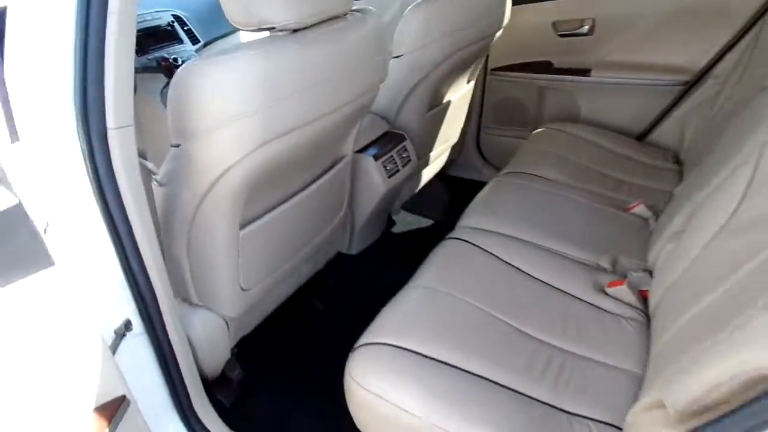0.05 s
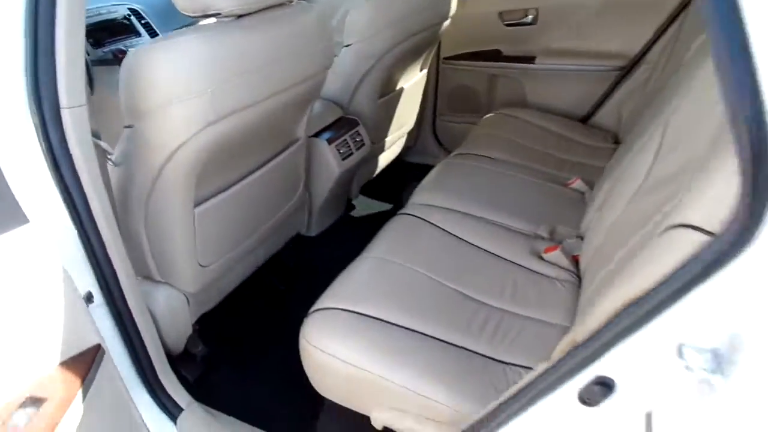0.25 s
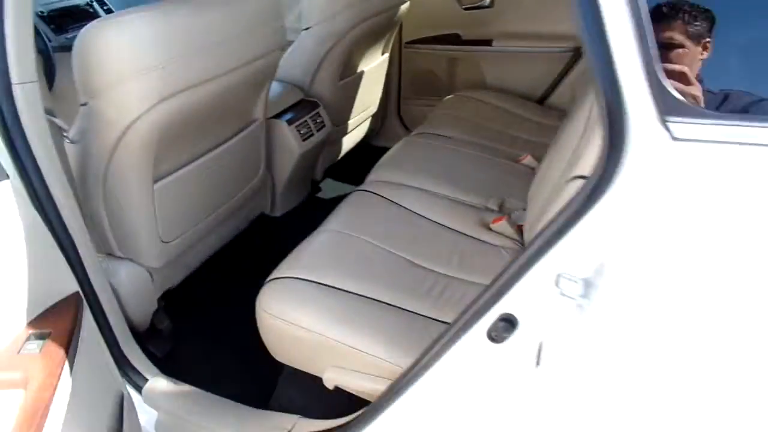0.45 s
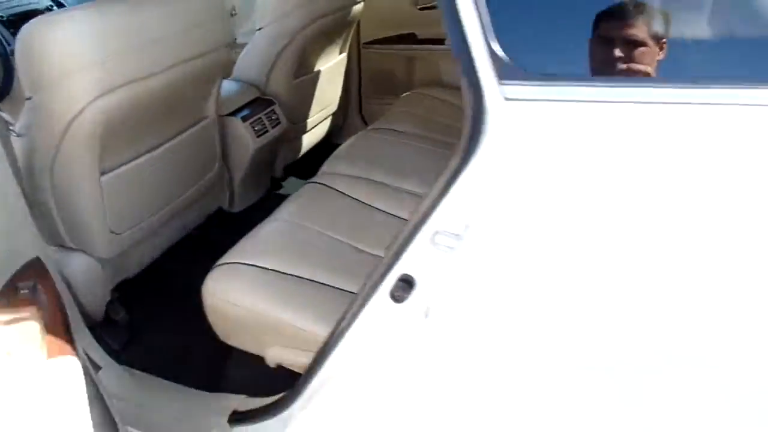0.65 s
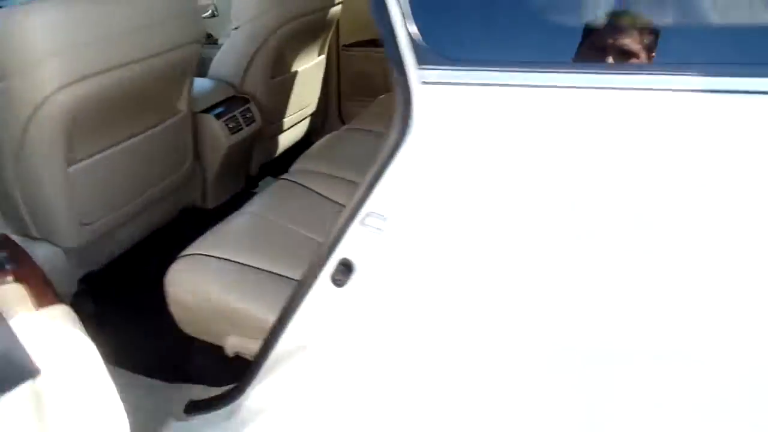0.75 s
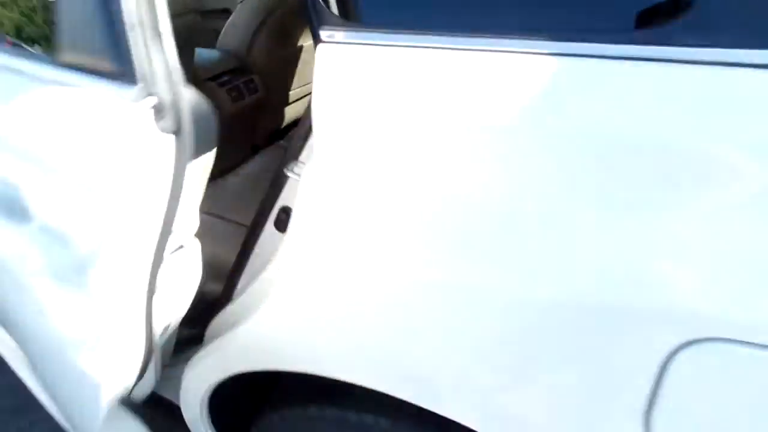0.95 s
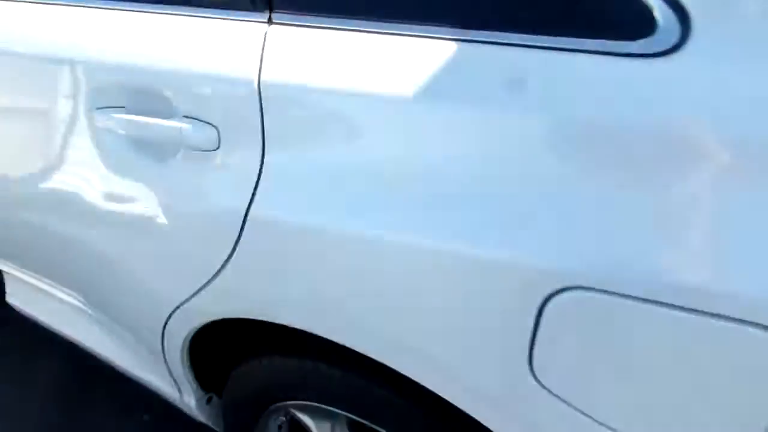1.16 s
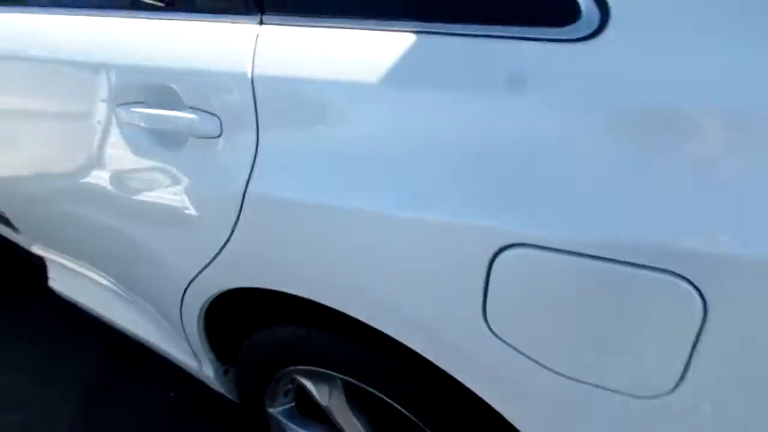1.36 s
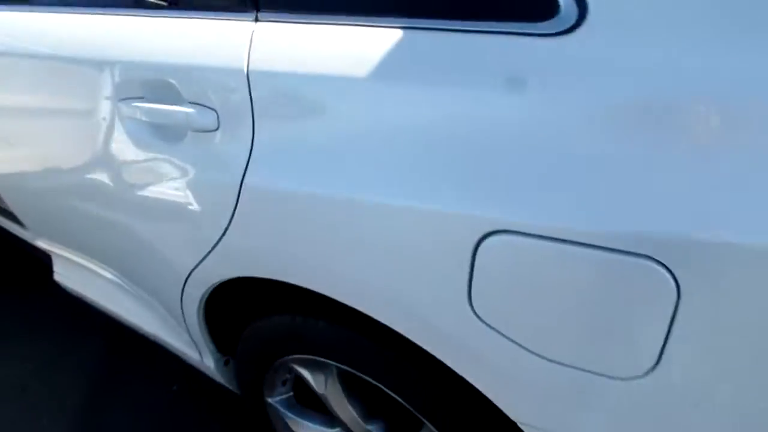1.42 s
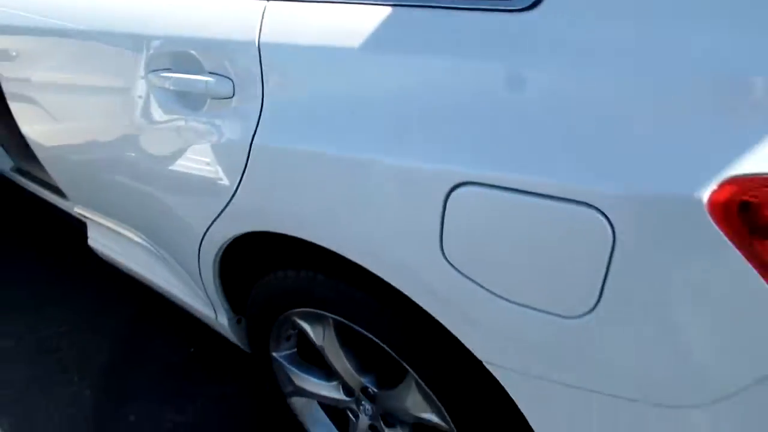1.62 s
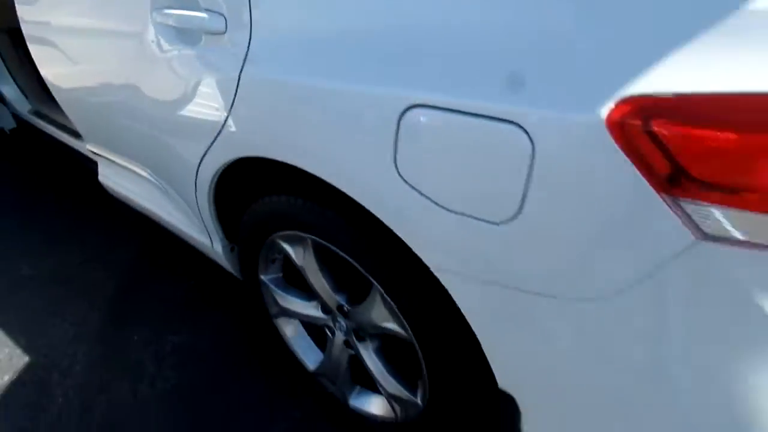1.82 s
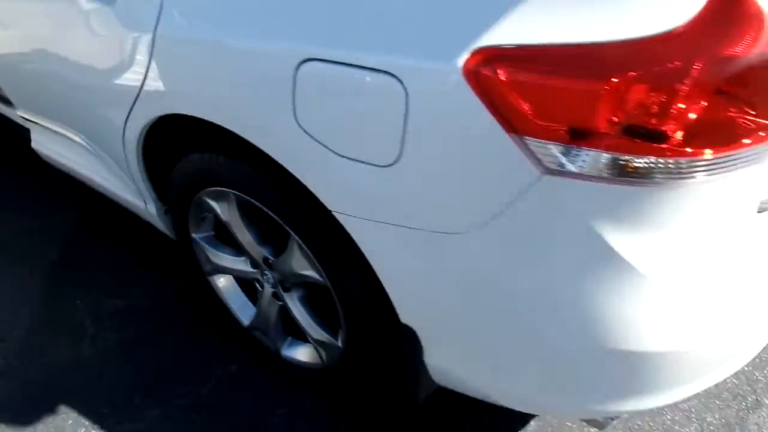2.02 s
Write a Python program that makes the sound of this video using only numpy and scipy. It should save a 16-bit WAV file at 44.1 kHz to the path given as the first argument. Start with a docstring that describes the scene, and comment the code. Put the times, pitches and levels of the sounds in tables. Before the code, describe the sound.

Outdoors beside a car, a brief gust rumbles on the microphone, then the rear door slams with a knock, a thump and a tiny rattle. A longer gust follows, with a faint rush of air behind.

```python
"""Car door in the wind

Outdoors by a car, one microphone. The rear door is pushed shut: the latch catches twice, the panel
rings, the body thumps and the trim rattles briefly. Wind buffets the microphone in a short gust
before the slam and a longer one after it, while air rushes in the background."""
import sys
import numpy as np
from scipy.fft import rfft, irfft, next_fast_len
from scipy.io import wavfile
from scipy.ndimage import map_coordinates

SR = 44100
rng = np.random.default_rng(int(sys.argv[2]) if len(sys.argv) > 2 else 0)


def to_wav(sig):
    """Store sig (one row per channel, or 1-D mono) as 16-bit WAV at the path in sys.argv[1].

    Samples outside -1..1 are clipped; the rate is SR.
    """
    pcm = np.clip(np.atleast_2d(sig), -1, 1) * 32767
    pcm = np.round(pcm).astype(np.int16)
    wavfile.write(sys.argv[1], SR, pcm.T)  # frames by channels


N = 91860

# spectrum of the treble hiss and the scuff: f/Hz, level/dB
HISS_SPECTRUM = [(500, -23.5), (2500, 5), (4500, 0.5), (7000, -2), (10000, -5.5), (13500, -5),
                 (16000, -8.5)]


def door_slam():
    """At the car: each contact rings the panel and the latch, cracks, and thuds through the body."""
    # contacts of the door: t/s, panel ring/dB, latch ring/dB, crack/dB, body thud/dB
    contacts = [(1.1442, -5.5, -8, -19, -20.5), (1.1497, -30, -25, -33, -33),
                (1.1572, -41, -20, -16, -23.5), (1.1610, -14.5, -22, -10.5, -16.5),
                (1.1638, -21, -21, -10.5, -27), (1.1891, -21.5, -28, -29, -17),
                (1.2278, -29.5, -39, -48, -25.5)]
    # modes of the door panel: f/Hz, level/dB, t60/s
    panel_modes = [(611, -1.5, 0.045), (666, -4.5, 0.059), (744, -7, 0.024), (786, -5, 0.043),
                   (864, -12, 0.037), (930, -15, 0.029), (1082, -6, 0.036), (1140, -23, .03)]
    # modes of the steel latch: f/Hz, level/dB, t60/s
    latch_modes = [(1710, -7, 0.014), (2126, -8.5, 0.018), (2350, -2, 0.0077), (2560, -0.5, 0.0076),
                   (3080, -9.5, .008)]
    # modes of the car body and cabin air: f/Hz, level/dB, t60/s
    body_modes = [(33, -17, .25), (64, -8, 0.13), (121.5, -6.5, 0.087), (145.5, -4, 0.13),
                  (224, 4.5, 0.078), (279, -3, 0.086), (369, -2, 0.074)]
    # spectrum of the crack: f/Hz, level/dB
    crack_spectrum = [(150, -22), (600, 10.5), (1200, 6.5), (2700, -6.5), (4200, -12), (7000, -19.5),
                      (12000, -22), (16000, -27)]
    out = np.zeros(N)
    for start, panel_db, latch_db, crack_db, thud_db in contacts:
        t = since(start)
        out += amp(panel_db) * ring(panel_modes, t, attack_s=0.00053)
        out += amp(latch_db) * ring(latch_modes, t, attack_s=0.00025)
        out += amp(crack_db) * fade(t, attack_s=0.00009, t60_s=0.024) * noise(crack_spectrum)
        out += amp(thud_db) * ring(body_modes, t, attack_s=0.0031)
    return out


def trim_rattle():
    """The trim rattles on after the slam, a grainy noise that dies quickly."""
    # spectrum of the rattle: f/Hz, level/dB
    rattle_spectrum = [(100, -7), (400, 2), (650, -0.5), (1100, 0.5), (1500, -7), (2700, -7), (4500, -16.5),
                       (8000, -23.5), (16000, -30)]
    grain_db = 1.3
    rattle = unit(noise(rattle_spectrum) * amp(grain_db * wobble(knots_per_s=500)))
    return amp(-26.5) * fade(since(1.161), attack_s=0.0016, t60_s=0.25) * rattle


def door_scuff():
    """One faint, bright scuff as the door swings in."""
    return amp(-38) * fade(since(0.521), attack_s=0.001, t60_s=0.04) * noise(HISS_SPECTRUM)


def wind_eddies():
    """Right at the microphone: each eddy is a brief suck and push of pressure with a steep core."""
    # single eddies: t/s, level/dB, f/Hz
    eddies = [(.353, -24.5, 58), (.435, -29.5, 55), (0.6362, -12.5, 249), (0.65, -14, 240),
              (.658, -16, 172), (0.6683, -12, 148), (0.677, -13.5, 136), (0.6877, -11, 298),
              (0.7033, -11, 209), (0.793, -27, 268), (0.898, -26.5, 247), (0.916, -23, 265),
              (0.9254, -23.5, 250), (0.981, -26, 234), (.993, -21.5, 207), (1.061, -22.5, 293),
              (1.135, -15.5, 240), (1.509, -24, 600), (1.513, -17.5, 243), (1.525, -23, 520),
              (1.5285, -22.5, 655), (1.542, -22, 325), (1.556, -20, 427), (1.5607, -16, 342),
              (1.5662, -19, 406), (1.574, -24, 497), (1.584, -21, 268), (1.594, -16.5, 302),
              (1.602, -23, 242), (1.627, -20.5, 540), (1.6315, -19.5, 540), (1.635, -13.5, 172),
              (1.661, -16, 280), (1.6994, -15, 390), (1.7065, -10.5, 283), (1.7099, -21, 325),
              (1.7252, -15, 690), (1.737, -22.5, 443), (1.745, -13.5, 374), (1.7707, -13, 312),
              (1.7854, -19, 264), (1.797, -16, 191), (1.8104, -16.5, 322), (1.824, -20.5, 276),
              (1.895, -19, 240), (1.92, -20.5, 370), (1.986, -22.5, 290)]
    half_width_cycles, fringe_share, core_gain = 0.43, 0.41, 0.067
    out, t = np.zeros(N), np.arange(N) / SR
    for centre, db, hz in eddies:
        cycles = (t - centre) * hz
        falloff = (cycles / half_width_cycles) ** 2
        envelope = (1 - fringe_share) * np.exp(-falloff) + fringe_share * np.exp(-falloff / 4)
        phase = 2 * np.pi * cycles + 0.25 * rng.standard_normal()
        core = core_gain * np.exp(-2 * falloff) * np.sin(2 * phase)  # shorter, an octave up
        out += amp(db) * (envelope * np.sin(phase) + core)
    return out


def microphone_crackles():
    """Sharp ticks as the first gust overloads the microphone."""
    # crackles: t/s, level/dB
    crackles = [(0.6789, -14.5), (.687, -16), (.702, -17.5)]
    return sum(amp(db) * fade(since(start), attack_s=0.00001, t60_s=0.0012) for start, db in crackles)


def wind_buffeting():
    """Gusts on the microphone: lumpy low noise over a deep rumble."""
    # course of the gusts: t/s, level/dB
    gust_levels = [(0, -33), (.6, -36.5), (.66, -24.5), (.702, -23.5), (.72, -38), (.79, -36), (.83, -46.5),
                   (.9, -36), (.99, -34), (1.02, -39), (1.06, -31), (1.1, -39.5), (1.2, -29.5),
                   (1.33, -40.5), (1.4, -50.5), (1.47, -41.5), (1.51, -27), (1.57, -29.5), (1.68, -35.5),
                   (1.72, -26.5), (1.82, -35), (1.86, -36.5), (1.91, -33.5), (1.95, -37), (1.99, -33.5),
                   (2.04, -41), (2.08, -58)]
    # spectrum of the gusts: f/Hz, level/dB
    gust_spectrum = [(30, -16), (70, 1), (115, 0), (230, 0.5), (330, -3.5), (450, -14.5), (700, -21),
                     (1200, -32.5), (3000, -69)]
    # course of the rumble: t/s, level/dB
    rumble_levels = [(0, -49), (.28, -36), (.35, -32), (.48, -36.5), (.6, -32.5), (.66, -25.5), (.72, -42),
                     (.81, -48), (.88, -35.5), (1.1, -37.5), (1.28, -46.5), (1.38, -46), (1.46, -46),
                     (1.52, -39), (1.8, -41), (1.94, -57), (2.08, -41)]
    # spectrum of the rumble: f/Hz, level/dB
    rumble_spectrum = [(12, -45), (30, -10.5), (58, -7.5), (90, -7), (160, -3.5), (500, -70)]
    lumps_db = 1.0
    buffeting = unit(amp(lumps_db * wobble(knots_per_s=60)) * noise(gust_spectrum))
    return level(gust_levels) * buffeting + level(rumble_levels) * noise(rumble_spectrum)


def background_air():
    """Air rushes and hisses; the recorder's automatic gain turns it down abruptly after loud sounds."""
    # course of the rush, gain dips written in: t/s, level/dB
    rush_levels = [(0, -36.5), (.11, -34), (.3, -36.5), (.5, -34.5), (.6, -36), (.702, -36), (.71, -44),
                   (.83, -45.5), (1.0, -40.5), (1.14, -40.5), (1.2, -39.5), (1.28, -54), (1.45, -50.5),
                   (1.85, -50.5), (2.08, -49.5)]
    # spectrum of the rush: f/Hz, level/dB
    rush_spectrum = [(60, -4), (85, -19), (114, -0.5), (142, -18.5), (300, -4.5), (450, 0.5), (600, -2),
                     (1200, -3), (2000, -10), (3200, -19), (6000, -28.5), (16000, -41)]
    # course of the hiss, gain dips written in: t/s, level/dB
    hiss_levels = [(0, -52), (.5, -50.5), (.58, -52), (.702, -50), (.71, -70), (.78, -58), (.86, -59),
                   (1.0, -54), (1.14, -52), (1.2, -67), (1.28, -67), (1.45, -62), (1.78, -60), (1.92, -62),
                   (1.94, -56), (2.08, -58)]
    flutter_db = 0.28
    flutter = amp(flutter_db * wobble(knots_per_s=24.7))
    rush = level(rush_levels) * noise(rush_spectrum)
    hiss = level(hiss_levels) * noise(HISS_SPECTRUM)
    return flutter * (rush + hiss)


def ring(modes, t, attack_s):
    """Struck modes, their levels a little different at each blow."""
    scatter_db, longest_s = 0.5, 0.35
    out, live = np.zeros(N), (t > 0) & (t < longest_s)
    for hz, db, t60_s in modes:
        gain = amp(db + scatter_db * rng.standard_normal())
        out[live] += gain * fade(t[live], attack_s, t60_s) * np.sin(2 * np.pi * hz * t[live])
    return out


def fade(t, attack_s, t60_s):
    """Quick rise and exponential decay."""
    return (1 - np.exp(-t / attack_s)) * amp(-60 * t / t60_s)


def noise(spectrum):
    """Noise of rms 1, shaped by points of f/Hz, level/dB."""
    f, db = np.transpose(spectrum)
    white = rng.standard_normal(N)
    return unit(filtered(white, lambda hz: amp(np.interp(np.log(hz + 1), np.log(f), db))))


def filtered(x, response):
    """Filter x by a gain given as a function of frequency."""
    size = next_fast_len(N + SR // 2)
    return irfft(rfft(x, size) * response(np.fft.rfftfreq(size, 1 / SR)), size)[:N]


def wobble(knots_per_s):
    """A smooth random curve."""
    return map_coordinates(rng.standard_normal(1024), [np.arange(N) * knots_per_s / SR], mode="mirror")


def level(points):
    """Gain per sample from points of t/s, level/dB."""
    return amp(np.interp(np.arange(N) / SR, *np.transpose(points)))


def since(start):
    """Seconds since a moment, zero before it."""
    return np.maximum(np.arange(N) / SR - start, 0)


def amp(db):
    """Decibels to gain."""
    return 10 ** (np.asarray(db) / 20)


def unit(x):
    """Scale to rms 1."""
    return x / np.sqrt(np.mean(x ** 2) + 1e-20)


def scene():
    """Door, wind and air at one microphone in the open."""
    door = door_scuff() + door_slam() + trim_rattle()
    wind = wind_buffeting() + wind_eddies() + microphone_crackles()
    return (door + wind + background_air())[None]


def record(dry):
    """The recorder rounds off the highest peaks and keeps nothing above its band limit."""
    ceiling, band_limit_hz = 0.75, 16000
    rounded = dry[0] / (1 + (dry[0] / ceiling) ** 6) ** (1 / 6)
    return filtered(rounded, lambda hz: hz < band_limit_hz)[None]


dry = scene()
out = record(dry)
to_wav(out)
```